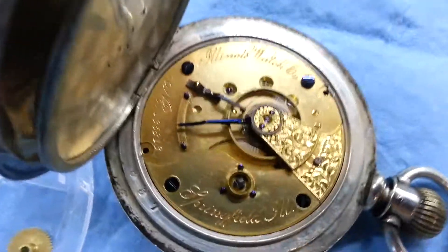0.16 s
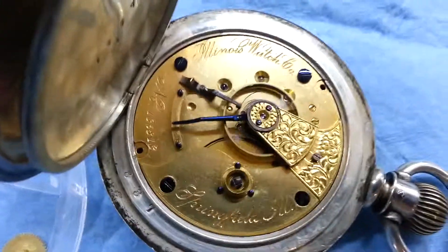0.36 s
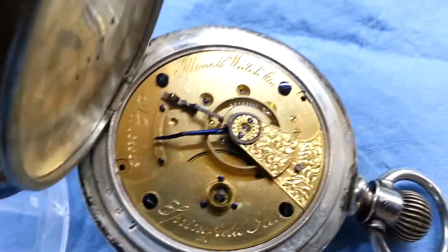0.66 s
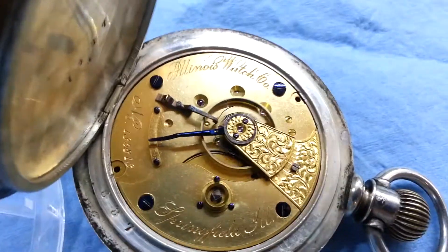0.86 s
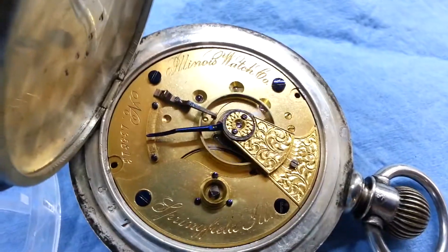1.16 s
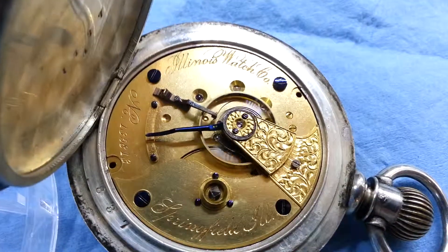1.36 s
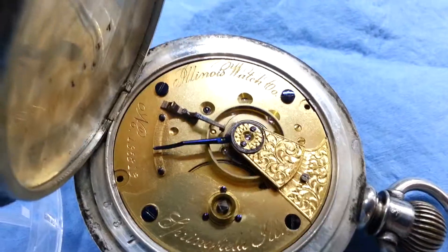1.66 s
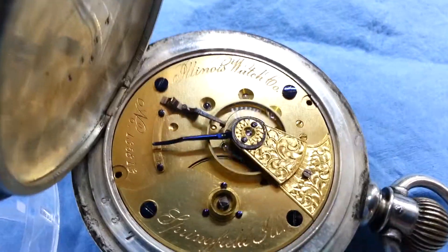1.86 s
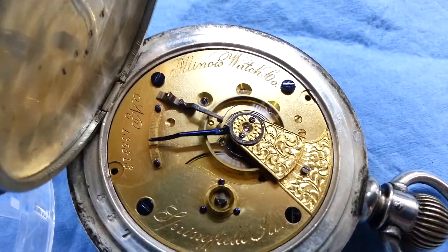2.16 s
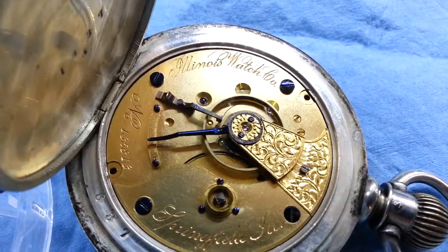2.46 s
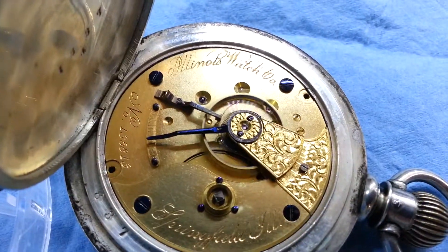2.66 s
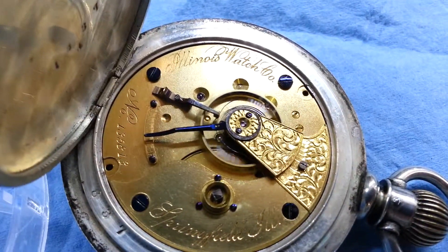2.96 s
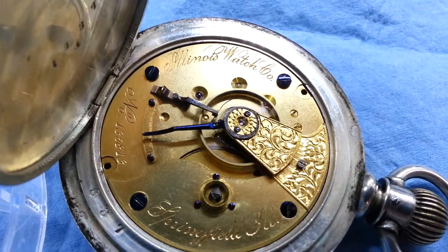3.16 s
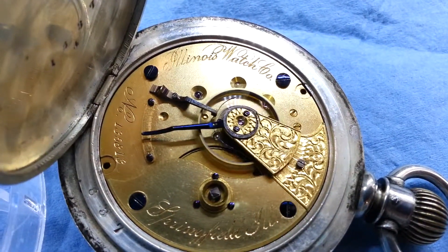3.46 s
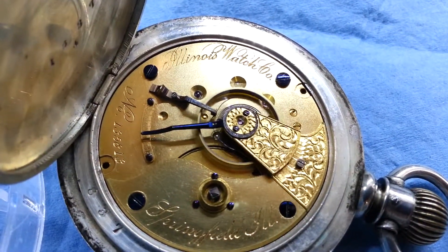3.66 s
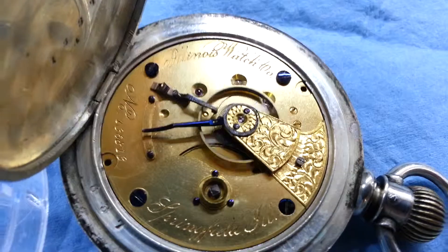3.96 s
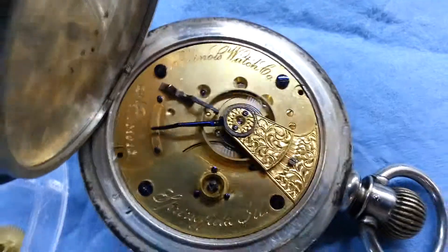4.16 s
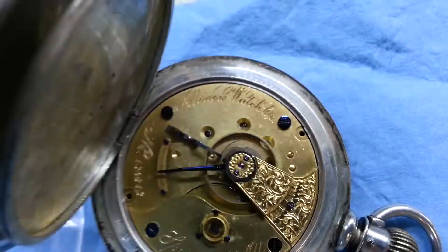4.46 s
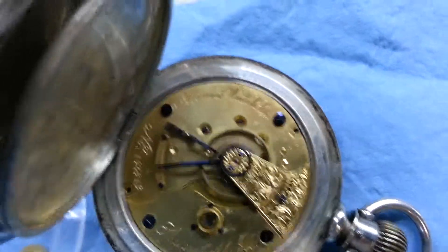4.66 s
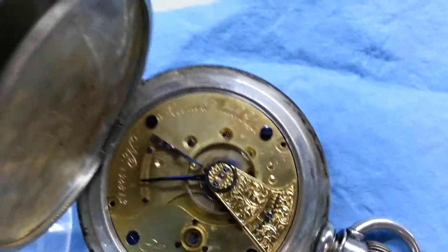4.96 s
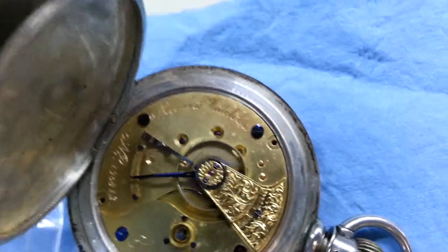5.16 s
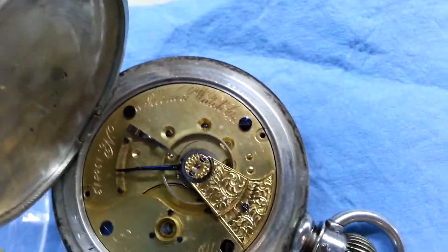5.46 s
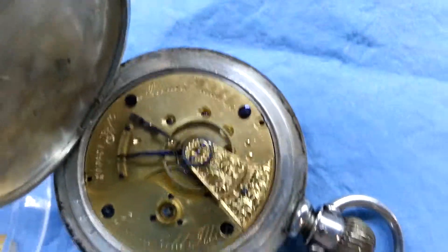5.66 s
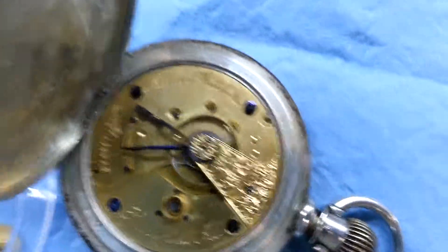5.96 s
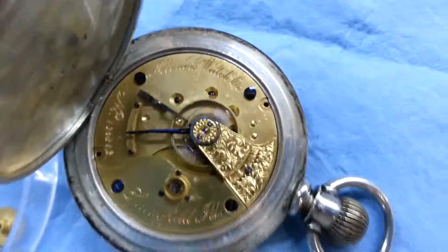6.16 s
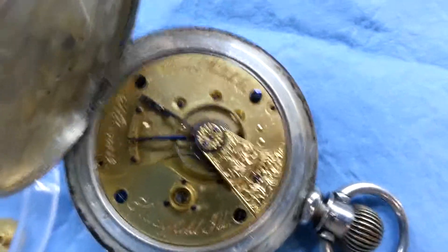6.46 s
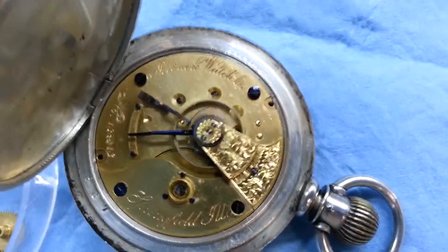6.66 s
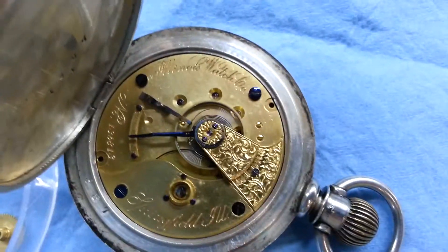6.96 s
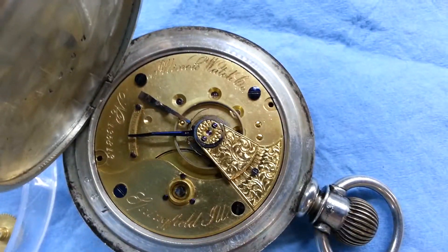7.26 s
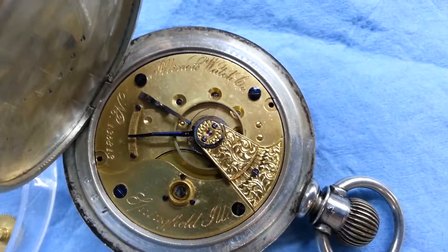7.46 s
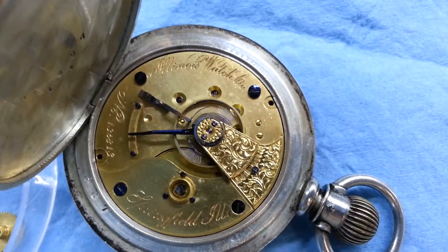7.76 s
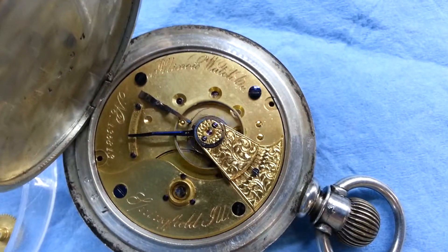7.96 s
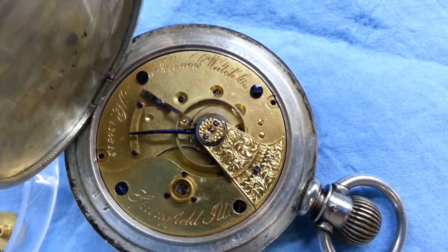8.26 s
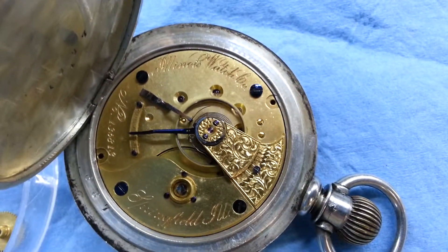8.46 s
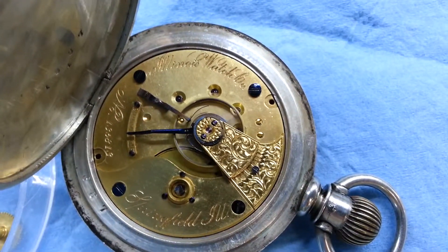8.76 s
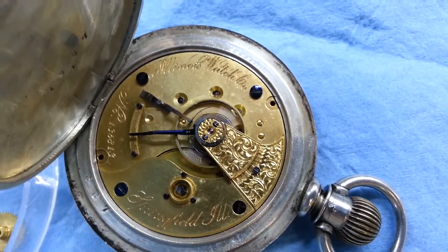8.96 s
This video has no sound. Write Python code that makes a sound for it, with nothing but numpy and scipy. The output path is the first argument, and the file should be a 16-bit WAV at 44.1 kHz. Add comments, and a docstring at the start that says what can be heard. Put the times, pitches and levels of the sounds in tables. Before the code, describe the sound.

Fast, light metallic ticking from an open pocket watch in a quiet room, interrupted by a few clicks from fingers near the microphone.

```python
"""A fan, mains hum and microphone hiss fill a quiet room from the start. Almost at once an open pocket
watch on a cloth is heard ticking five times a second, nearer the right port of a hand-held camera.
Each beat is three blows of the escapement (unlocking, impulse, drop) that ring the plates and case.
From 0.4 s to about 7 s, fingers shifting on the camera stick and slip, sending spells of pops and
crackle into the right port. The watch ticks on to the end."""
import sys
import numpy as np
from scipy import signal
from scipy.fft import rfft, irfft
from scipy.io import wavfile
from scipy.ndimage import uniform_filter1d

SR = 44100
rng = np.random.default_rng(int(sys.argv[2]) if len(sys.argv) > 2 else 0)


def put_to_file(sound):
    """Save the sound as 16-bit audio at rate SR, in the file named by the first command-line argument."""
    columns = np.atleast_2d(sound).T  # one column per channel
    safe = np.clip(columns, -1, 1)
    whole_steps = np.round(safe * 32767)
    wavfile.write(sys.argv[1], SR, whole_steps.astype(np.int16))


N = 401310
KNEE_HZ, EDGE_HZ = 14600, 15900  # treble shelf, band limit


def amp(db):
    """Amplitude ratio: a factor of ten for every 20 dB."""
    return 10 ** (np.asarray(db) / 20)


def unit_rms(x):
    """Normalisation to unit mean power."""
    return x / np.sqrt(np.mean(x ** 2) + 1e-20)


def spectrum_at(points, hz):
    """Interpolation on a logarithmic frequency axis."""
    f, value = np.transpose(points)
    return np.interp(np.log(hz + 1), np.log(f + 1), value)


def add(mix, start_s, sound):
    """Superposition of a two-channel sound on the mix."""
    part = mix[:, round(start_s * SR):][:, :sound.shape[1]]
    part += sound[:, :part.shape[1]]


def delay_right(x, lag_samples=10):
    """Arrival-time difference: the room's sound reaches the right port later."""
    return np.array([x[0], np.roll(x[1], lag_samples)])


# Spectrum of the room noise: (frequency [Hz], relative spectral density [dB])
AIR_SPECTRUM = [(25, -31), (75, -22.5), (105, -3.5), (165, -8.5), (235, 1), (320, -7.5), (750, -8),
                (1150, -17), (1500, -18), (3300, -23), (4900, -28.5), (6400, -32.5), (7800, -29.5),
                (14400, -31)]
# Likeness of that noise at the two ports: (frequency [Hz], correlation [0 to 1])
AIR_CORRELATION = [(60, 0.31), (110, 0.28), (240, 0.74), (400, 0.38), (600, 0.93), (1000, 0.63),
                   (1600, 0.11), (2500, 0)]
# Its balance between the ports: (frequency [Hz], left minus right [dB])
AIR_BALANCE = [(60, -6.5), (250, 0.3), (1000, 1), (2200, 3.5), (5000, -0.7), (12000, -0.5)]


def room_air(level_db=-51):
    """Partial coherence: fan rush is partly shared by the ports; the treble hiss is independent."""
    frames, hz = N // 256 + 5, np.fft.rfftfreq(1024, 1 / SR)
    left_re, left_im, own_re, own_im, flicker = rng.standard_normal((frames, 513, 5)).T
    flicker = uniform_filter1d(flicker, size=12, axis=0)  # smooth over frequency
    flicker_db = 1.16 * unit_rms(uniform_filter1d(flicker, size=14, axis=1))  # and over time
    shared = np.clip(spectrum_at(AIR_CORRELATION, hz), 0, 1)[:, None]
    left = left_re + 1j * left_im
    right = shared * left + np.sqrt(1 - shared ** 2) * (own_re + 1j * own_im)
    lean_db = spectrum_at(AIR_BALANCE, hz)[:, None] / 2
    colour = amp(spectrum_at(AIR_SPECTRUM, hz)[:, None] + flicker_db + np.array([lean_db, -lean_db]))
    spectra = np.array([left, right]) * colour * (hz[:, None] < KNEE_HZ)
    rush = signal.istft(spectra, nperseg=1024, noverlap=768)[1][:, :N]
    return delay_right(amp(level_db) * unit_rms(rush))


# Fan and mains tones: (frequency [Hz], rms level before the split between ports [dB], bandwidth [Hz])
HUM_TONES = [(107.1, -67, 0.59), (119.2, -68, 0.46), (192.6, -62, 2.8), (239.7, -59, 2.5),
             (287.4, -75, 5.3), (480, -83.5, 1.57), (516, -65.5, 6), (644, -69.5, 3.8), (755, -68, 8),
             (869, -68, 2.5)]


def hum(steadiness=2.13):
    """Narrow-band modulation: each tone wavers as a steady part beats with 24 close components."""
    t, out = np.arange(N) / SR, np.zeros(N)
    coarse_t = np.arange(0, N + 200, 200) / SR
    for hz, db, width_hz in HUM_TONES:
        offsets, phases = rng.standard_normal((2, 24, 1))
        components = np.exp(1j * (np.pi * width_hz * offsets * coarse_t + 9 * phases))
        phasor = steadiness / np.sqrt(width_hz) + components.sum(0) / np.sqrt(24)
        envelope = np.interp(t, coarse_t, phasor)
        carrier = np.exp(2j * np.pi * hz * t)
        out += amp(db) * unit_rms(envelope.real * carrier.real + envelope.imag * carrier.imag)
    return delay_right(out * np.array([amp(.5), amp(-.5)])[:, None])


# Modes of plates and case: (frequency [Hz], relative level [dB], T60 [s], left minus right [dB])
WATCH_MODES = [(3272, -21.5, 0.068, 4), (3445, -23.5, 0.12, 5.5), (3640, -24.5, 0.14, 5),
               (4020, -29, 0.18, -1.5), (4440, -12.5, .025, -4.5), (4747, -13, 0.037, -1.5),
               (5560, -16, 0.057, -5), (7816, -12.5, .03, -7), (8200, -5.5, 0.024, -27),
               (8390, 3, 0.03, -15.5), (8740, -7.5, 0.051, -14), (9388, -18, 0.054, -1),
               (9870, -21, 0.073, -19), (10030, -15, .04, -10), (10530, -14, 0.027, -7),
               (10880, -14, .03, -3), (11230, -13.5, 0.036, -15), (11770, -17, 0.057, -11),
               (11900, -12, .055, -9), (12320, -20.5, 0.16, -8), (13100, -29, .06, -9),
               (14060, -35, .035, -3)]
# Spectrum of the contact noise: (frequency [Hz], relative level [dB])
CRACK_SPECTRUM = [(2400, -15), (3400, -14.5), (4600, -4.5), (6500, -9), (8200, -4.5), (11300, -2.5),
                  (15000, 0.5)]


def blow(db, plates_db, case_left_db, chatter_s=0.0036, crack_t60=0.034, tail_t60=0.19):
    """Impact excitation: steel rebounds on jewel, ringing damped modes over a short crack of noise."""
    hz, mode_db, t60, side_db = np.transpose(WATCH_MODES)[:, :, None]
    t = np.arange(SR // 8) / SR
    strength, right_shift, left_shift, detune = rng.standard_normal((len(hz), 4)).T[:, :, None]
    is_case = (hz > 8000) & (hz < 9000)  # the other modes belong to the plates
    mode_db = mode_db + 2.2 * strength + np.where(is_case, 0, plates_db)
    phase = 2 * np.pi * hz * (1 + .002 * detune) * t + 2 * right_shift
    slow_tail = amp(-25 - 60 * t / tail_t60)
    decay = amp(mode_db) * (amp(-60 * t / t60) + slow_tail)
    # the left port is further off: its phase trails by about a quarter turn
    left = amp(side_db + is_case * case_left_db) * decay * np.sin(phase - 1.6 + left_shift)
    right = decay * np.sin(phase)
    modes = np.array([left.sum(0), right.sum(0)])
    rebounds = rng.standard_normal(400) * (rng.random(400) < .15) * np.exp(-t[:400] / chatter_s)
    rebounds[0] = 1.2  # the first contact
    ringing = signal.fftconvolve(modes, rebounds[None] / np.linalg.norm(rebounds), axes=1)[:, :len(t)]
    colour = amp(spectrum_at(CRACK_SPECTRUM, np.fft.rfftfreq(len(t), 1 / SR)))
    crack = unit_rms(irfft(rfft(rng.standard_normal((2, len(t)))) * colour, len(t)))
    crack *= amp(4 + plates_db - 60 * t / crack_t60) * amp([[-7.], [0]])
    sound = ringing + crack * (1 - np.exp(-6 * t / chatter_s))
    onset = sound[1, :SR * 6 // 1000]  # db sets the rms of the first 6 ms at the right port
    return amp(db) * sound / np.sqrt(np.mean(onset ** 2))


# The watch as heard while the camera drifts over it:
# (time [s], beat level [dB], gain of plates against case [dB], gain of case at the left port [dB])
CAMERA_DRIFT = [(0, -38, 7, 0), (1.0, -39.5, 0, 4), (1.5, -35.5, 0.5, -4), (2.5, -37.5, -0.5, -4),
                (3.4, -35.5, 3.5, 3), (4.4, -36, 2.5, -10), (4.8, -31.5, -7, -10), (5.4, -34.5, -7, -3),
                (5.8, -33.5, 0, 0), (6.9, -35, -4.5, 2), (8.2, -36, -1.5, 5), (9.1, -36, -1, 6)]
# Tick, then tock; levels are relative to the beat level, leads are ahead of the drop:
# (drop level [dB], unlocking lead [s], impulse lead [s], unlocking level [dB], impulse level [dB])
TICK_TOCK = [(1, 0.022, .013, -13.5, -13.5), (-4.5, .0213, .015, -12, -14.5)]


def watch(first_s=.1348, beat_s=.19986, beats=45, spread_db=.8, jitter_s=.0004):
    """Periodic impacts: each beat unlocks, impulses and drops, in alternating ticks and tocks."""
    out = np.zeros((2, N))
    times, *drift = np.transpose(CAMERA_DRIFT)
    for k, (jitter, *scatter) in enumerate(rng.standard_normal((beats, 4))):
        drop_s = first_s + k * beat_s + jitter_s * jitter
        db, plates_db, case_left_db = (np.interp(drop_s, times, column) for column in drift)
        drop_db, unlock_lead, impulse_lead, unlock_db, impulse_db = TICK_TOCK[k % 2]
        levels = db + np.array([unlock_db, impulse_db, drop_db])
        unlock_db, impulse_db, drop_db = levels + spread_db * np.array(scatter)
        # on unlocking, the fork stirs the case less
        add(out, drop_s - unlock_lead, blow(unlock_db, plates_db + 8, case_left_db))
        add(out, drop_s - impulse_lead, blow(impulse_db, plates_db, case_left_db, chatter_s=0.0071))
        add(out, drop_s, blow(drop_db, plates_db, case_left_db))
    return out


# Skin rubbing the camera shell: (start [s], end [s], slip rate [1/s], base level [dB])
RUB_SPELLS = [(.4, 0.483, 600, -48), (1.383, 1.818, 340, -45.5), (4.097, 4.564, 1000, -45),
              (4.457, 4.48, 3200, -47.5), (5.047, 5.5, 570, -52), (5.608, 5.756, 1300, -44),
              (6.04, 6.06, 720, -44)]


def crackle():
    """Stick-slip friction: tiny slips come at random, each ringing briefly at one of four pitches."""
    t, chance = np.arange(N) / SR, rng.random(N)
    excess_db = 2.2 * np.minimum(rng.exponential(1, N), 3)
    slips, out = np.zeros(N), np.zeros(N)
    for start, end, rate, db in RUB_SPELLS:
        slips += (t > start) * (t < end) * (chance < rate / SR) * amp(db + excess_db)
    pitch_index, age = rng.integers(0, 4, N), t[:90]
    for k, hz in enumerate(np.geomspace(3000, 13000, 4)):
        grain = np.sin(2 * np.pi * hz * age) * np.exp(-age * hz / .8)
        out += np.convolve(slips * (pitch_index == k), grain)[:N]
    return out * amp([[-12.], [0]])


# Pops at the right port: (time [s], snap level [dB], thud level [dB], nominal thud frequency [Hz])
FINGER_POPS = [(.4166, -42, -27, 1360), (0.4594, -45, -28, 800), (.4689, -20.5, -23, 480),
               (1.3976, -50, -25, 704), (1.493, -50, -29, 880), (1.6815, -28, -33, 600),
               (1.6948, -22, -26, 550), (1.751, -18, -19.5, 487), (1.7526, -8, -17, 694),
               (1.7601, -5.5, -13, 517), (1.7625, -36, -18.5, 690), (4.1066, -31, -24, 560),
               (4.11, -32, -17.5, 443), (4.1194, -17, -14, 447), (4.1528, -20, -21.5, 437),
               (4.284, -32, -50, 900), (4.466, -25.5, -50, 900), (4.613, -50, -34, 2300),
               (4.662, -26.5, -35, 1100), (5.2503, -40, -50, 3000), (5.6218, -20.5, -14.5, 6600),
               (5.682, -23, -44, 1500), (5.687, -24, -47, 1200), (5.6915, -40, -28, 1000),
               (5.7205, -28, -37, 1200), (5.7353, -36, -30.5, 700), (5.8291, -20.5, -19, 810),
               (5.8439, -50, -25.5, 526), (5.8643, -22.5, -21, 4220), (6.826, -43, -30, 3000)]


def pops(damping=1.18, glide_cycles=0.38, load_s=8.3e-5, slip_s=5e-5, push_from_s=3):
    """Damped oscillation: skin loads and slips with a snap; the port air swings back, slowing."""
    out, t = np.zeros((2, N)), np.arange(-40, 600) / SR
    after, before = np.maximum(t, 0), np.minimum(t, 0)
    for time_s, snap_db, thud_db, hz in FINGER_POPS:
        shell_rattle = .3 * rng.standard_normal(len(t)) * np.exp(-after / 2.5e-4) * (t > 0)
        snap = amp(snap_db) * (np.exp(before / load_s - after / slip_s) + shell_rattle)
        cycles = 0.73 * hz * after + glide_cycles * (1 - np.exp(-after * hz * 1.45))
        thud = -amp(thud_db) * np.sin(2 * np.pi * cycles) * np.exp(-damping * hz * after)
        polarity = np.sign(time_s - push_from_s)  # the grip pulls on the port air first, later pushes
        add(out, time_s + t[0], polarity * (snap + thud) * amp([[-28.], [0]]))
    return out


def port(pressure, vent_hz=120, duct_hz=6200):
    """Acoustic filtering: the port holds no steady pressure, and its duct weakens a band of treble."""
    vented = signal.sosfilt(signal.butter(2, vent_hz, "high", fs=SR, output="sos"), pressure)
    duct = signal.iirpeak(duct_hz, Q=2.2, fs=SR)
    return vented - .6 * signal.lfilter(*duct, vented)


def scene():
    """Superposition: watch, finger noise and room add at the two ports."""
    return watch() + port(pops() + crackle()) + room_air() + hum()


def record(dry):
    """Band limiting: the response rises gently to the knee, steps down about 40 dB, then cuts off."""
    corners_hz = [0, KNEE_HZ - 100, KNEE_HZ + 200, EDGE_HZ, SR / 2]
    shelf = signal.firwin2(1023, corners_hz, amp([-0.5, 2.5, -39, -38, -30]), fs=SR)
    lowpass = signal.firwin(511, EDGE_HZ + 100, window=("kaiser", 9), fs=SR)
    return signal.oaconvolve(dry, np.convolve(shelf, lowpass)[None], "same")


dry = scene()
out = record(dry)
put_to_file(out)
```